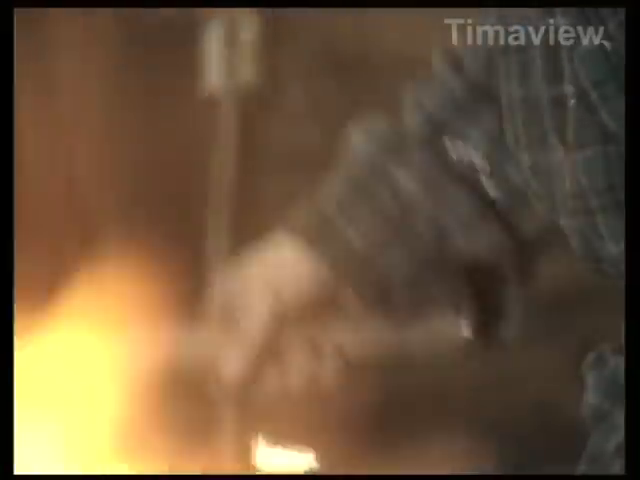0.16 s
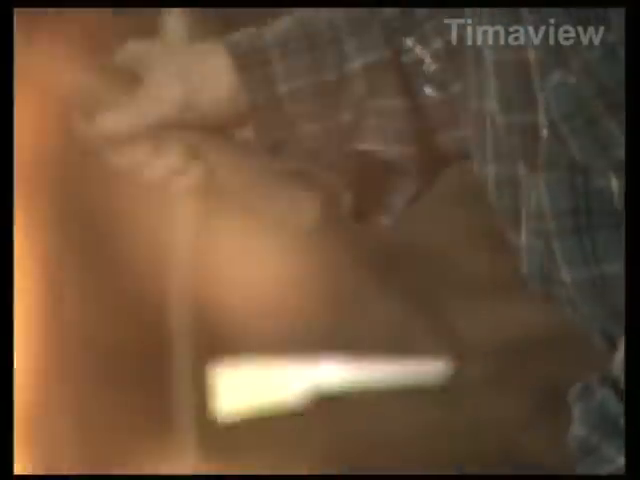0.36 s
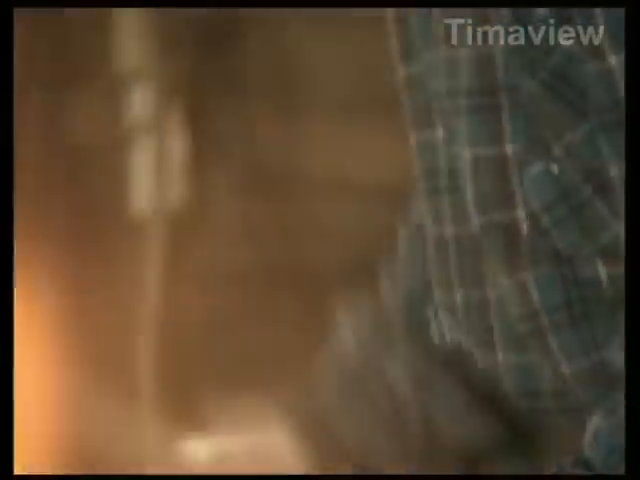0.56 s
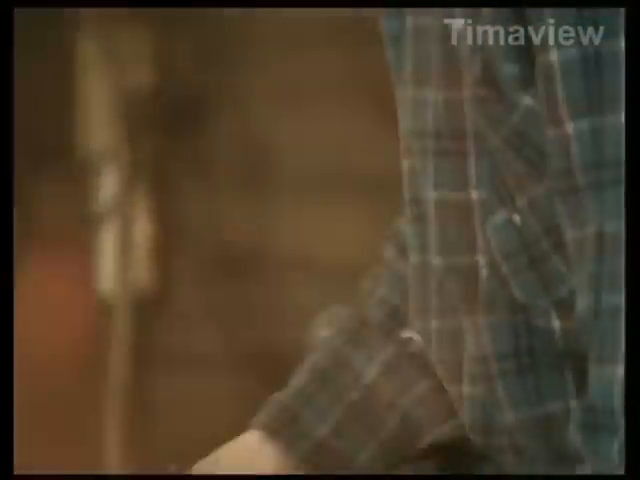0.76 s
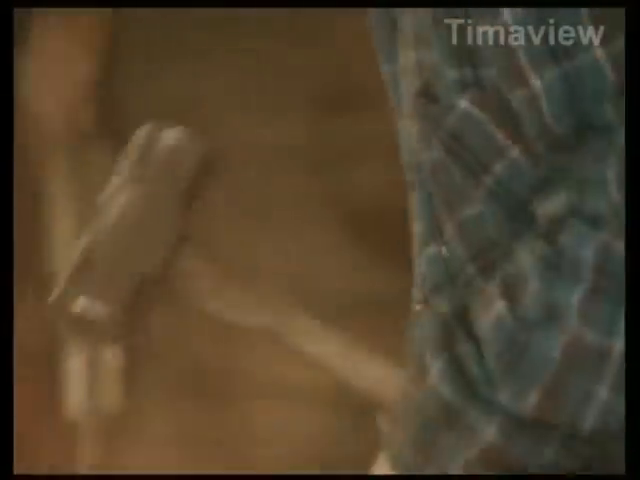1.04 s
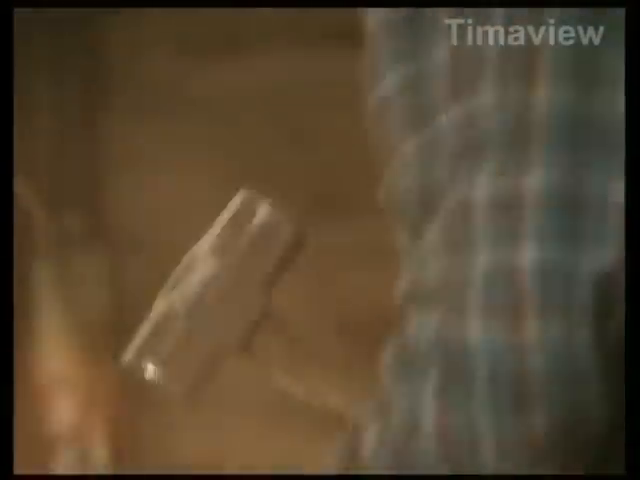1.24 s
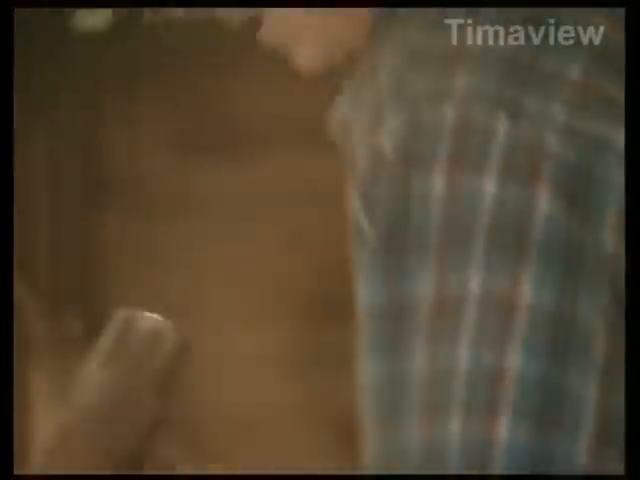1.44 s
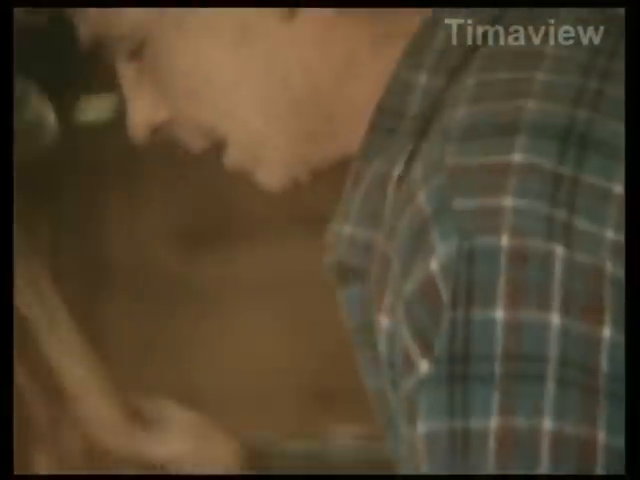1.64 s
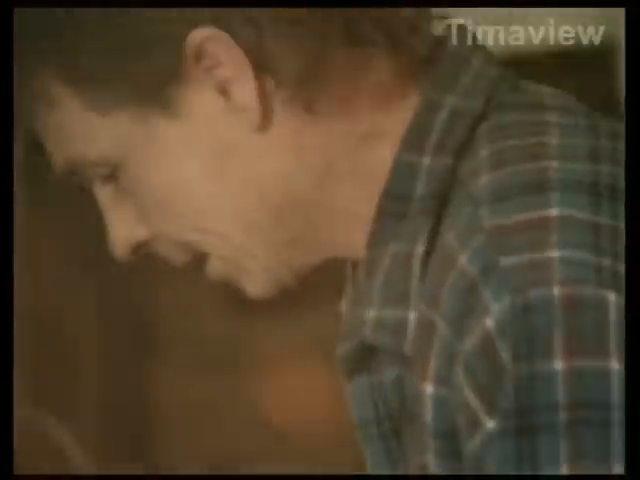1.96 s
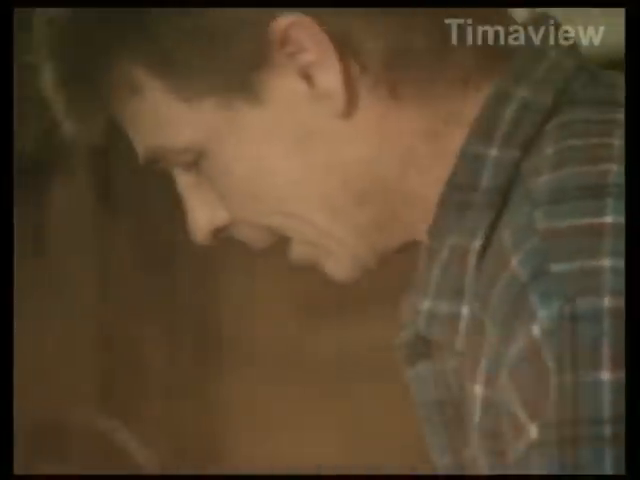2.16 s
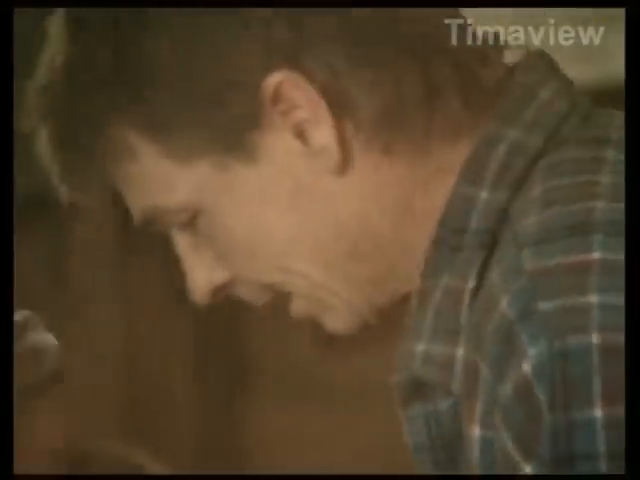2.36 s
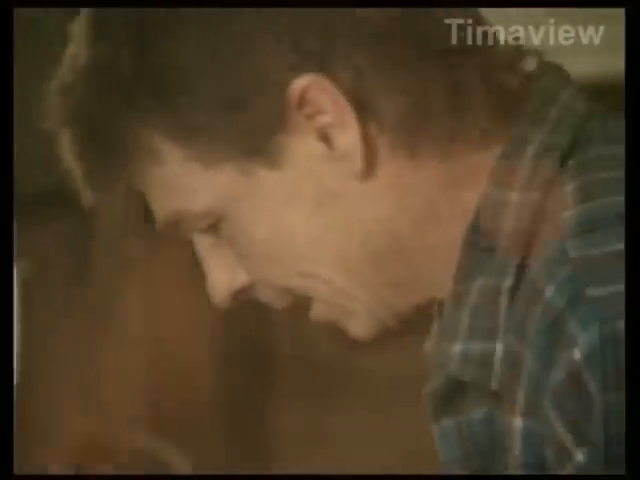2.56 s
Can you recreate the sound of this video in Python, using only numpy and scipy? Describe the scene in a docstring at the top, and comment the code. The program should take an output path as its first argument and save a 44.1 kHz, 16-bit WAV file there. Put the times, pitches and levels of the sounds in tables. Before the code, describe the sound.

Hammer blows on an anvil in a hard-walled forge. The tail of an earlier blow fades, then heavy sledge blows ring at 0.23 and 0.76 seconds. Faint taps and a slight whine come around 1.1 to 1.4, then bright steel tool clangs at 1.56, 1.85, 2.13 and a thinner one at 2.26, with short reverberation. Low fire roar and faint hum continue beneath; mono, slightly squashed peaks.

```python
"""First the last ringing of an earlier sledge blow dies away over a low forge fire and mains hum.
Two sledge blows on hot iron follow, then taps and clangs of a steel tool on the anvil face, in a hard-walled
workshop heard by a mono microphone. Each contact is shaped noise plus ringing sine waves with a noise room tail.
Fire and ticks are noise; the hum and a faint passing whine are sine waves."""
import sys
import numpy as np
from scipy import signal
from scipy.fft import rfft, irfft, next_fast_len
from scipy.io import wavfile
from scipy.ndimage import uniform_filter1d, map_coordinates

SR = 44100
rng = np.random.default_rng(int(sys.argv[2]) if len(sys.argv) > 2 else 0)


def gain_from_db(level_db):
    """Convert decibel levels to linear amplitude factors (20 dB per decade)."""
    decades = np.asarray(level_db, float) / 20
    return 10 ** decades


def transcribe(signal):
    """Save signal, clipped to [-1, 1], as a 16-bit WAV file at the path in sys.argv[1]."""
    frames = np.atleast_2d(signal).T
    limited = np.clip(frames, -1, 1)
    pcm = np.round(limited * 32767).astype(np.int16)
    wavfile.write(sys.argv[1], SR, pcm)


N = 119070  # length [samples]
LEAD = SR // 2  # room for a blow before the start [samples]


def unit(x):
    """Scales a sound to an rms level of 1."""
    return x / np.sqrt(np.mean(x ** 2) + 1e-20)


def along(points, hz):
    """Reads a curve of (frequency [Hz], value) points on a log frequency axis."""
    f, v = np.transpose(points)
    return np.interp(np.log(hz + 1), np.log(f + 1), v)


def filtered(x, gain):
    """Multiplies the spectrum of x by a gain that depends on frequency."""
    m = next_fast_len(len(x) + 8192)
    return irfft(rfft(x, m) * gain(np.fft.rfftfreq(m, 1 / SR)), m)[:len(x)]


def dying_noise(t60s, size):
    """Noise in which every frequency dies at its own speed; energy 1."""
    hz, t, z = signal.stft(rng.standard_normal(size), SR, nperseg=256)
    t60 = np.clip(along(t60s, hz), .02, 3)[:, None]
    tail = signal.istft(z * gain_from_db(-60 * t / t60), SR, nperseg=256)[1][:size]
    return tail / np.linalg.norm(tail)


def small_modes(count):
    """Many short, weak rings at random pitches, as sine waves that die away; one row each."""
    t = np.arange(SR // 2) / SR
    hz = rng.uniform(1800, 12500, count)[:, None]
    return np.sin(2 * np.pi * hz * t) * gain_from_db(-60 * t / rng.uniform(0.1, 0.37, (count, 1)))


def strong_modes(modes, place, waver_rad):
    """The clear pitches of the metal: wavering sine waves that swell as the room fills, then die."""
    waver_hz, waver_db = 18, 4.5  # random points per second; level change per radian of waver
    t = np.arange(SR) / SR
    hz, level_db, t60, swell, place_db = np.transpose(modes)[..., None]
    knots = np.meshgrid(np.arange(len(modes)), t * waver_hz, indexing="ij")
    waver = waver_rad * map_coordinates(rng.standard_normal((len(modes), 40)), knots, order=1)
    wave = np.sin(2 * np.pi * hz * t + waver)
    wave *= gain_from_db(waver_db * waver[::-1])  # each level follows the waver of another mode
    return wave * gain_from_db(level_db + place * place_db - 60 * t / t60) * (1 - np.exp(-t / swell)) ** 2


# How fast the clatter dies: (frequency [Hz], time to fall 60 dB [s])
CLATTER_DECAY = [(300, 0.34), (2000, 0.19), (6000, 0.27), (13000, 0.28)]
# Colour of the thud: (frequency [Hz], relative gain [dB])
THUD_GAIN = [(20, -37), (60, -30), (150, -10.5), (350, 4), (700, 3), (1300, 2), (2500, -24)]
# How fast the echo of the hard walls dies: (frequency [Hz], time to fall 60 dB [s])
WALL_DECAY = [(200, 0.42), (1000, 0.73), (4000, 0.62), (8000, 0.46), (13000, 0.21)]


def strikes(rows, modes, colour, ring_db, crack_db, crack_s, small_db, scatter_db, wet_db, waver_rad, count):
    """Each contact: a crack, clatter, a thud and small modes in a fresh room tail, a low thump, strong modes."""
    band_octaves = 0.11  # spread of the loudest band
    small_scatter_db = 2.5
    # low thump under each hit: level relative to the thud [dB], time constant [s]
    thump_db, thump_s = -24, 0.016
    out, t = np.zeros(LEAD + N + 3 * SR), np.arange(SR) / SR
    mode_hz = np.transpose(modes)[0]
    small = small_modes(count)
    for s, db, tilt_db, own_ring_db, thud_db, rise, place, band_hz, lift_db in rows:
        def band(f):
            octaves = np.log2((f + 1) / band_hz)
            return gain_from_db(lift_db * np.exp(-.5 * (octaves / band_octaves) ** 2))

        def tilt(f):
            return gain_from_db(tilt_db * np.log2(np.clip(f, 500, SR) / 4000)) * band(f)

        def body_gain(f):
            return gain_from_db(along(colour, f)) * tilt(f) + gain_from_db(thud_db + along(THUD_GAIN, f))

        body = dying_noise(CLATTER_DECAY, size=SR) * np.sqrt(SR / 20)
        # the crack is lifted by the band here and again in body_gain
        body += gain_from_db(crack_db - 60 * t / crack_s) * filtered(rng.standard_normal(SR), band)
        small_level = gain_from_db(small_db + small_scatter_db * rng.standard_normal(count))
        body[:SR // 2] += small_level @ small / np.sqrt(count)
        direct = filtered(body, body_gain) * (1 - np.exp(-t / abs(rise)))

        echo = signal.fftconvolve(direct, dying_noise(WALL_DECAY, size=SR))
        echo = np.pad(echo, (150, 0))[:2 * SR]  # the echo starts 150 samples later
        hit = np.pad(direct, (0, SR)) + gain_from_db(wet_db) * echo
        hit[:SR] += gain_from_db(thump_db + thud_db) * (t / thump_s) * (2 - t / thump_s) * np.exp(-t / thump_s)

        strong = strong_modes(modes, place, waver_rad)
        mode_gain = gain_from_db(ring_db + own_ring_db + rng.normal(0, 1, len(modes)) * scatter_db)
        hit[:SR] += mode_gain * tilt(mode_hz) @ strong
        out[LEAD + round(s * SR):][:2 * SR] += gain_from_db(db) * hit
    return out[LEAD:LEAD + N]


# Sledge blows on hot iron: (time [s], relative level [dB], tilt [dB per octave], relative ring level [dB],
# relative thud level [dB], place [-1 heel to 1 horn, or beyond], loudest band [Hz], its lift [dB])
SLEDGE_BLOWS = [(.234, -6, 2, 6.5, -1, 0.67, 5880, 4.5), (.762, -2.5, 3.5, 0, -6, -0.94, 3170, 4)]
# One blow before the start, with the same columns
BLOW_BEFORE_START = (-0.405, -1, -0.5, 0.5, -10, -2.5, 5297, 2.5)
# Anvil pitches: (frequency [Hz], relative level [dB], time to fall 60 dB [s], swell time constant [s],
# gain toward the horn [dB])
ANVIL_MODES = [(1400, -29, 1.56, .05, 3), (1514, 24, .27, 0.14, -2.5), (1619, -14, 0.72, 0.024, -5),
               (2480, -14, 0.52, 0.04, -4.5), (2640, -16, 0.55, .03, -2), (3224, -15, 0.56, 0.027, -3),
               (3274, -6.5, .7, 0.065, 0), (3577, -7, .55, 0.06, 1), (3895, -13, 0.42, 0.033, -10),
               (4150, 8, 0.33, 0.075, 0), (4480, -7, 0.53, .04, 6), (4970, -20, 0.31, .03, 4),
               (5220, -24.5, .7, .03, -3), (5630, -22, 0.44, 0.033, -8), (6235, -20, 0.56, .03, -2),
               (6590, -15, 0.43, 0.033, -2), (7700, -16, 0.47, .03, -4), (8650, -24, 0.6, 0.022, -2),
               (10600, -32, 0.52, 0.022, -3), (11400, -32, 0.33, .02, -4)]
# Colour of the blows' clatter: (frequency [Hz], relative gain [dB])
BLOW_GAIN = [(350, -11), (600, -4.5), (1370, 0.5), (1480, 10.5), (1810, 2.5), (4140, 4), (9550, -7),
             (12200, -14.5), (13000, -41)]


def sledge():
    """Heavy blows; the anvil sings through the thud."""
    rise_s = .001
    rows = [(*row[:5], rise_s, *row[5:]) for row in [BLOW_BEFORE_START, *SLEDGE_BLOWS]]
    return gain_from_db(-5) * strikes(rows, ANVIL_MODES, BLOW_GAIN, ring_db=3.5, crack_db=11, crack_s=0.048,
                             small_db=3, scatter_db=0.5, wet_db=-1, waver_rad=0.36, count=200)


# Colour of the fire: (frequency [Hz], relative gain [dB])
FIRE_GAIN = [(15, -9), (35, -16), (75, -19), (130, -10.5), (190, -2), (480, -2.5), (800, -11),
             (1100, -16.5), (2000, -42), (3000, -32), (4600, -39), (11400, -38.5), (13000, -47)]


def forge_fire():
    """A low roar: noise whose level flutters separately across pitch and time."""
    z = signal.stft(rng.standard_normal(N + 512), nperseg=512)[2]
    field = uniform_filter1d(rng.standard_normal(z.shape), 4, 0)  # smooth across pitch
    field = uniform_filter1d(field, 8, 1)  # smooth across time
    flutter = gain_from_db(1.8 * unit(field))
    noise = signal.istft(z * flutter, nperseg=512)[1][:N]
    return gain_from_db(-37.5) * unit(filtered(noise, lambda f: gain_from_db(along(FIRE_GAIN, f))))


# Mains hum: (frequency [Hz], level [dB rms])
HUM_TONES = [(50, -59), (100, -61)]


def mains_hum():
    """Steady sine waves at the mains pitch and its octave."""
    t = np.arange(N) / SR
    return np.sqrt(2) * sum(gain_from_db(db) * np.sin(2 * np.pi * hz * t) for hz, db in HUM_TONES)


# Faint ticks: (time [s], relative level [dB])
TICKS = [(.19, -38), (.695, -44), (1.515, -42), (2.668, -31.5)]


def ticks():
    """Faint ticks: short dying bursts of thin noise, with the low end taken away."""
    bursts, t = np.zeros(N + SR), np.arange(800) / SR
    for s, db in TICKS:
        bursts[round(s * SR):][:len(t)] += gain_from_db(db - 60 * t / 0.014) * rng.standard_normal(len(t))
    return filtered(bursts[:N], lambda f: f ** 2 / (f ** 2 + 3500 ** 2))


# A faint tone: (frequency [Hz], level [dB rms], start [s], end [s], octave above relative to it [dB])
WHINE_TONE = (677, -47, 1.05, 1.42, -8)


def passing_whine():
    """A sine wave and its octave that fade in and out over 0.04 s."""
    t = np.arange(N) / SR
    hz, db, start, end, octave_db = WHINE_TONE
    gate = np.clip(np.minimum(t - start, end - t) / .04, 0, 1)
    wave = np.sin(2 * np.pi * hz * t) + gain_from_db(octave_db) * np.sin(4 * np.pi * hz * t)
    return np.sqrt(2) * gain_from_db(db) * gate * wave


# Steel on steel: (time [s], relative level [dB], tilt [dB per octave], relative ring level [dB],
# relative thud level [dB], rise time constant [s], place [-1 edge to 1 middle, or beyond],
# loudest band [Hz], its lift [dB])
TOOL_CLANGS = [(1.114, -38.5, -9, 4, -25.5, 0.0075, 0.95, 2850, 8.5),
               (1.252, -34.5, -2, 0, -32, 0.0024, -.3, 5700, 2.5),
               (1.363, -28, -0.5, 1, -28, 0.0024, 0.11, 3600, 4),
               (1.563, 1, -1.5, -4, -16, 0.0084, 1.05, 6400, 1),
               (1.8, -25, -2.5, -3, -40, 0.0031, 0, 4000, 1),
               (1.849, -2.5, 1, -4, -17.5, 0.0037, -1.5, 4650, 2.5),
               (2.135, -3.5, 2.5, -22, -8, 0.0019, -.3, 5110, 3.5),
               (2.259, -8, -1, -5.5, -49, 0.0027, .2, 3130, 2.5),
               (2.643, -62, -10.5, -31.5, 12, 0.0032, 0, 1213, 19.5)]
# Tool pitches: (frequency [Hz], relative level [dB], time to fall 60 dB [s], swell time constant [s],
# gain toward the middle [dB])
TOOL_MODES = [(1544, -12.5, 0.36, 0.019, -0.5), (2295, -16, 0.31, 0.029, 2.5), (2830, -13, .45, 0.036, 5),
              (3120, -14, 0.73, 0.058, -1), (3350, -18, 0.47, .03, 0), (3470, -21, 0.53, 0.033, -4),
              (3610, -10.5, .45, 0.035, 5), (3880, -13.5, 0.47, .02, 2), (3930, -11, 0.33, 0.014, 2.5),
              (4360, -15, 0.39, .02, -2), (4650, -8.5, 0.18, 0.0038, -5), (5000, -21, 0.28, .03, 4),
              (5700, -19, 0.34, 0.028, 7), (5980, -7, 0.32, 0.022, -2), (8050, -12, .4, 0.022, 0),
              (6570, -19.5, 0.27, 0.011, -7.5), (7470, -12, 0.31, .02, 1), (6500, -17, 0.29, .02, -7),
              (9600, -21.5, 0.54, 0.022, 3), (10300, -27, 0.33, 0.023, 0), (10700, -31, 0.5, 0.022, 8),
              (11830, -22, .3, .02, 2)]
# Colour of the clangs' clatter: (frequency [Hz], relative gain [dB])
CLANG_GAIN = [(590, -34), (1000, -16), (1600, -3.5), (2100, -3), (3200, 3), (4500, 2.5), (5800, 2),
              (7000, 1), (10200, -5), (12300, -11.5), (13000, -25)]


def tool():
    """Bright clangs and light taps as steel rings against steel."""
    return gain_from_db(-5) * strikes(TOOL_CLANGS, TOOL_MODES, CLANG_GAIN, ring_db=8, crack_db=15.5, crack_s=0.029,
                             small_db=-1, scatter_db=3.5, wet_db=2.5, waver_rad=.9, count=200)


def scene():
    """Adds all the sources into one channel."""
    return (sledge() + forge_fire() + mains_hum() + ticks() + passing_whine() + tool())[None]


def top_cut(x):
    """Nothing passes above the cut-off."""
    return signal.sosfilt(signal.butter(12, 13670, fs=SR, output="sos"), x)


def record(dry):
    """A limiter grabs just after each onset, peaks round off, and treble above the band limit is cut."""
    limit_db, grab_s, let_go_s = -8.5, 0.0092, 0.022
    top_hz = 12750
    grab, let_go = np.exp(-1 / (grab_s * SR)), np.exp(-1 / (let_go_s * SR))
    power = signal.lfilter([1 - grab], [1, -grab], dry[0] ** 2)
    cut_db = np.maximum(10 * np.log10(power + 1e-12) - limit_db, 0)
    slow_cut_db = signal.lfilter([1 - let_go], [1, -let_go], cut_db)
    held = dry[0] * gain_from_db(-np.maximum(1.17 * cut_db, slow_cut_db))
    soft = held / (1 + np.abs(held / .84) ** 4) ** (1 / 4)
    mix = filtered(soft, lambda f: 1 / (1 + (f / top_hz) ** 80))[None]
    return top_cut(mix)


dry = scene()
out = record(dry)
transcribe(out)
```